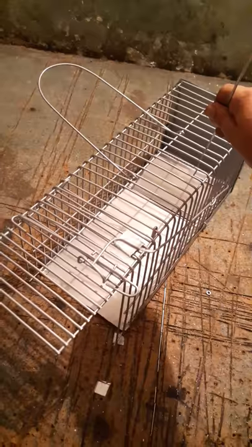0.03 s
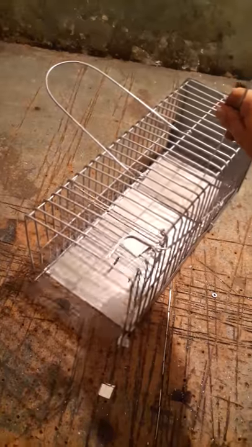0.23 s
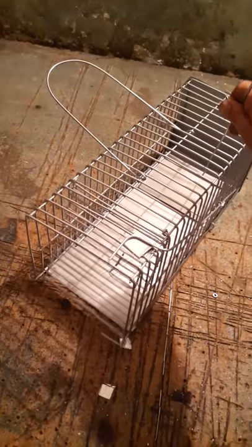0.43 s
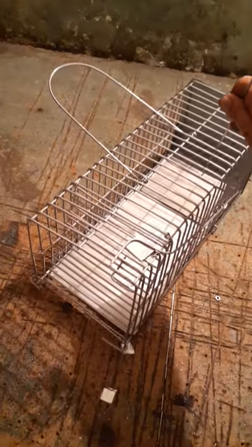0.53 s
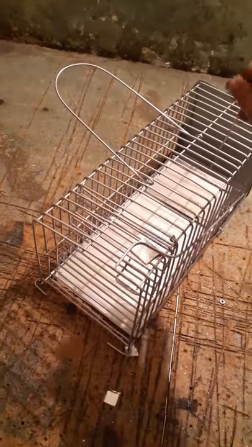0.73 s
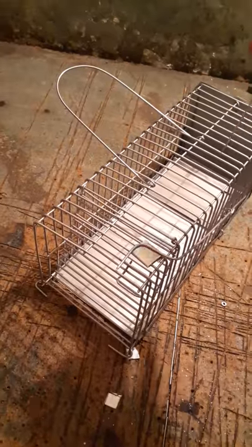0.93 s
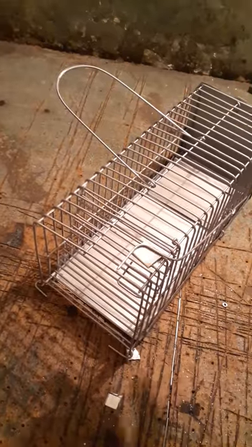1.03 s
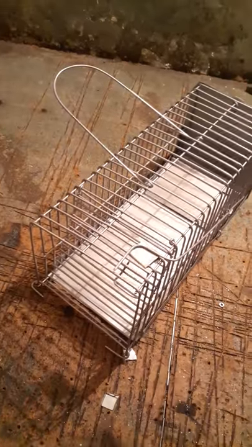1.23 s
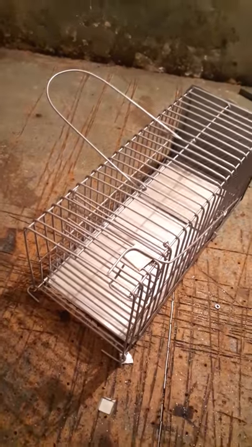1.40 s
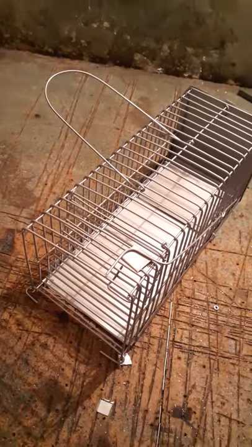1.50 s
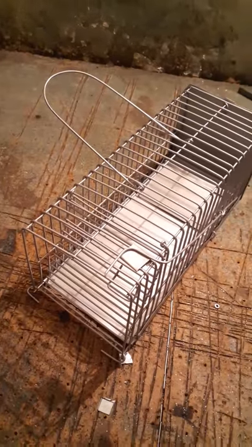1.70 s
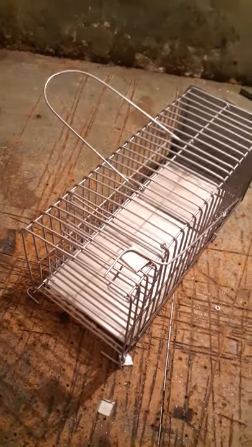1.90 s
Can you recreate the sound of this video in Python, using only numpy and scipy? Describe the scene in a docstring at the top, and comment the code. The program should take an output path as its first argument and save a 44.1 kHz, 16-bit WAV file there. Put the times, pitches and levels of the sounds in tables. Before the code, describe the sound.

Metal cage trap slams shut, its wires ringing and rattling as the lock drops.

```python
"""Cage trap slamming shut

A wire cage trap on concrete between hard walls, close to a stereo pair of microphones. Its sprung door
is tripped, swings down and slams; the locking bail drops with a high ping and rattles home. Every blow
rings the wires and the sheet floor, and the walls draw it out. One last click follows, over quiet air
with a low hum and faint, thin high buzzes."""
import sys
import numpy as np
from scipy import signal
from scipy.fft import rfft, irfft
from scipy.io import wavfile
from scipy.ndimage import uniform_filter1d

SR = 44100
rng = np.random.default_rng(int(sys.argv[2]) if len(sys.argv) > 2 else 0)


def to_wav(s):
    """Save 16-bit WAV."""
    ch = np.atleast_2d(s).T  # columns
    pcm = np.round(np.clip(ch, -1, 1) * 32767)  # PCM
    wavfile.write(sys.argv[1], SR, pcm.astype(np.int16))


N = 85995
T, F = np.arange(N) / SR, np.maximum(np.fft.rfftfreq(N, 1 / SR), 1)

# spectrum of the air in the place (frequency [Hz], relative level [dB])
AIR_SPECTRUM = [(18, -58.5), (30, -42.5), (75, -9.5), (177, -13), (243, -10), (277, -12), (350, -7),
                (420, -11.5), (970, -14.5), (1050, -16.5), (2180, -18), (3590, -35.5), (4910, -32),
                (7260, -37.5), (15500, -45)]
# low background hum (frequency [Hz], level [dB])
HUM_TONES = [(247.6, -69.5), (382, -75)]
# faint thin buzzes (start [s], end [s], frequency [Hz], width [Hz], level [dB])
HIGH_BUZZES = [(0.95, 1.19, 4960, 260, -63.5), (1.115, 1.5, 5000, 300, -67),
               (1.416, 1.689, 4910, 330, -73.5), (0.869, 1.099, 9330, 500, -68.5),
               (0.89, 1.119, 11400, 4320, -73), (1.76, 2.3, 14700, 2000, -79.5)]
# loose parts ringing briefly (time [s], frequency [Hz], width [Hz], level [dB], t60 [s])
LOOSE_PARTS = [(0.622, 1342, 300, -37.5, 0.32), (0.672, 255, 70, -47.5, 0.15),
               (0.870, 2113, 138.6, -54, 0.63), (1.080, 233, 160, -44, .06)]
# the catch settling (time [s], rise [s], relative level at each of BANDS_HZ [dB], decay scale [s])
CATCH_CLICKS = [(0.867, 0.014, -84, -70, -60, -71.5, -79, 1),
                (1.079, .002, -56, -53, -60, -85, -101.5, 0.038),
                (1.127, 0.0015, -64, -57.5, -57.5, -52, -39, 0.42),
                (1.812, .004, -58, -63, -78, -87, -97, 0.095)]
# modes of the door spring (frequency [Hz], level [dB], t60 [s])
SPRING_MODES = [(67.7, -46.5, .9), (294.3, -43, 0.52), (312, -48, .6), (613.4, -48, 0.66), (1070, -48, .7),
                (2110, -48.5, .6)]
# modes of the locking bail besides its main ping (frequency [Hz], level [dB], t60 [s])
BAIL_MODES = [(8768, -24.5, .17), (8715, -34, 0.19), (15430, -35.5, .33), (11830, -36, .38),
              (6400, -37.5, 0.51), (2156, -37.5, .4), (325, -33.5, .25)]
# modes of the frame and sheet floor (frequency [Hz], relative level [dB], t60 [s])
FRAME_MODES = [(70, -4, 0.76), (137.3, -9.5, 0.91), (198.2, -2.5, 0.47), (304, -3, 0.37), (325, -4.5, 0.48),
               (460, -10.5, 0.77), (667, 1, .7), (804, -8.5, .6), (907.7, 1, 0.37), (1075.3, -3, .7),
               (1858, -0.5, .5), (2136, -13, .7), (2902, -11.5, 0.41), (4407, -13.5, .45),
               (4720, -14.5, .42), (6280, -9.5, .6), (6520, -7.5, .55)]
# colour shared by all blows and clicks (frequency [Hz], gain [dB])
CLATTER_SPECTRUM = [(35, -30.5), (52, -23.5), (72, -5.5), (170, -3.5), (310, 1.5), (420, -2.5), (800, 2),
                    (1400, 1), (2100, 5.5), (2900, 1.5), (4200, 3.5), (6200, 5), (7400, 1), (9000, 2),
                    (12000, 2.5), (14300, 1.5), (15600, 0.5)]
# how long the clatter hangs between the walls (frequency [Hz], t60 [s])
CLATTER_DECAY = [(80, 0.29), (300, 0.64), (900, 0.71), (2200, 0.52), (5000, 0.47), (9000, 0.39),
                 (15000, 0.33)]
# blows on the cage (time [s], rise [s], relative level at each of BANDS_HZ [dB], push on the frame [dB])
CAGE_BLOWS = [(0.086, 0.0061, -54, -48, -54.5, -47, -45, -18),
              (0.122, .012, -49.5, -49, -48.5, -64, -81, -23.5),
              (0.156, .008, -43, -35.5, -45.5, -47, -46.5, -18),
              (0.201, 0.0034, -54.5, -34, -42, -39.5, -40, -22.5),
              (0.250, .009, -32, -26, -27, -26, -19, 1.5),
              (0.272, 0.0057, -53.5, -40, -40.5, -28.5, -30.5, -4.5),
              (0.318, .006, -34, -46, -37.5, -29.5, -24.5, -16),
              (0.463, 0.0085, -52, -41, -37, -36.5, -23, -11.5),
              (0.496, .003, -45, -35.5, -35.5, -32.5, -22.5, -13.5),
              (0.548, 0.0085, -60, -45, -54.5, -47.5, -30, -32),
              (0.585, .010, -53, -46, -57.5, -44, -48, -20),
              (0.632, 0.0084, -54, -53, -49.5, -73, -71, -28)]
# bass, low-mid, mid, presence and treble of a blow or click (frequency [Hz])
BANDS_HZ = [150, 650, 1800, 4800, 12000]

MIC_LAG_S, BAIL_LAG_S = .0002, .00036  # cage and bail reach the right microphone this much later
WIRE_DB, CRACK_DB, WASH_DB, FRAME_DB = -4, -8, 1.5, -30.5  # gains of the parts of a blow
CHATTER_S = .012  # time scale of the bounces within a blow


def undb(db):
    """Decibels to gain."""
    return 10 ** (np.asarray(db) / 20)


def unit(x):
    """Scale to rms 1."""
    return x / np.sqrt(np.mean(x ** 2))


def curve(points, hz):
    """Read (Hz, value) points on a log-frequency axis."""
    p = np.array(points, float)
    return np.interp(np.log(hz), np.log(p[:, 0]), p[:, 1])


def pan(db):
    """Microphone gains with the left louder by db."""
    return undb(np.vstack([db, -db]) / 2)


def fall(t, t60):
    """Exponential decay, 60 dB in t60 seconds."""
    return np.exp(-np.log(1000) * np.maximum(t, 0) / t60)


def attack(start, rise):
    """Linear rise from a given time."""
    return np.clip((T - start) / max(rise, 1e-4), 0, 1)


def diffuse(alike_below_hz=440):
    """Spectrum of noise at the two microphones: alike in the bass, unrelated above."""
    mid, side = np.exp(2j * np.pi * rng.random((2, len(F))))
    likeness = np.sinc(F / (2 * alike_below_hz))
    likeness += (1 - likeness) * np.exp(-(F / alike_below_hz) ** 2)
    side = side * np.sqrt(1 - likeness) * np.array([[1], [-1]])
    return (mid * np.sqrt(1 + likeness) + side) * np.sqrt(N / 2)


def band(hz, width):
    """Noise in one resonance."""
    return unit(irfft(diffuse() / (1 + ((F - hz) / width * 2) ** 2), N))


def mode(start, hz, t60, lag=0):
    """One decaying partial, lag seconds later at the right microphone."""
    t = np.maximum(T - start - np.array([[0], [lag]]), 0)
    return np.sin(2 * np.pi * hz * t) * fall(t, t60)


def colour(levels):
    """Gain per frequency of a blow: its band levels and the clatter's colour on a pink slope."""
    db = curve(list(zip(BANDS_HZ, levels)), F) + curve(CLATTER_SPECTRUM, F)
    return undb(db) * np.sqrt(SR / 2 / np.maximum(F, 100))


def clusters(depth_db=3, width_hz=51):
    """Uneven gain along the spectrum where the cage's resonances bunch together."""
    bins = int(width_hz * N / SR)
    ripple = uniform_filter1d(rng.standard_normal(len(F)), bins)
    ripple = unit(uniform_filter1d(ripple, bins // 2))
    return unit(undb(depth_db * ripple))


def background(lull_s=1.5, lull_db=-58.68, slope_db_per_s=2, fade_s=.085):
    """All around the microphones: air that sinks to a lull, a low hum, buzzes that swell and fade."""
    air = unit(irfft(diffuse() * undb(curve(AIR_SPECTRUM, F)), N))
    out = air * undb(lull_db + slope_db_per_s * abs(T - lull_s))
    out += sum(undb(db) * band(hz, width=8) for hz, db in HUM_TONES)
    for start, end, hz, width, db in HIGH_BUZZES:
        swell = attack(start, fade_s) * (1 - attack(end - fade_s, fade_s))
        out += undb(db) * band(hz, width) * swell
    return out


def wash(start, rise, gain, decay):
    """Countless cage modes and wall reflections, each octave dying at its own rate."""
    noise, out = diffuse() * gain, 0
    octave = np.clip(np.round(np.log2(F / 110)), 0, 7)
    for k in range(8):
        part = octave == k
        out += irfft(noise * part, N) * fall(T - start, curve(decay, F[part].mean()))
    return out * attack(start, rise)


def loose_parts():
    """Loose parts ring faintly after the slam, each half tone and half noise."""
    out = 0
    for start, hz, width, db, t60 in LOOSE_PARTS:
        ting = .66 * mode(start, hz, t60) + .7 * band(hz, width) * fall(T - start, t60)
        out += undb(db) * ting * attack(start, .016 * t60)
    return out


def catch(ring, bunching, ring_db=-1.5):
    """The catch settles in light clicks that stir the wires and come back off the walls."""
    out = 0
    for start, rise, *levels, decay_s in CATCH_CLICKS:
        gain = colour(levels) * bunching
        decay = [(500, 2.14 * decay_s), (5000, 1.06 * decay_s), (14000, .73 * decay_s)]
        out += wash(start, rise, gain, decay)
        struck = np.roll(irfft(ring * gain, N), int(start * SR), axis=1)
        out += undb(ring_db) * struck * attack(start, rise) * fall(T - start, 3 * decay_s)
    return out


def spring(start=.097):
    """Freed by the trigger, the spring twangs while the door swings."""
    twang = sum(undb(db) * mode(start, hz, t60, MIC_LAG_S) for hz, db, t60 in SPRING_MODES)
    return twang * attack(start, rise=.03)


def bail(start=.4592, ping_hz=13362):
    """The stiff locking wire lands left of centre: a high flash and softer tail over weaker modes."""
    flash = undb(-14) * mode(start, ping_hz, t60=.06, lag=BAIL_LAG_S)
    tail = undb(-18.5) * mode(start, ping_hz, t60=.29, lag=BAIL_LAG_S)
    body = sum(undb(db) * mode(start, hz, t60, BAIL_LAG_S) for hz, db, t60 in BAIL_MODES)
    return pan(db=4) * (flash + tail + body)


def wires(count=520, spread_db=1.5, t60_share=.83):
    """Spectrum of the ringing wires, each with its own pitch and its own strength at each microphone."""
    t, out = T[:N // 3], 0
    for draw, strength in zip(rng.random((count, 4)), rng.standard_normal((count, 2))):
        height, sustain, offsets = draw[0], draw[1], draw[2:, None]
        hz = 450 + 15200 * height ** 2
        t60 = t60_share * curve(CLATTER_DECAY, hz) * (.8 + .4 * sustain)
        mic_gains = undb(spread_db * np.tanh(strength))[:, None] * np.sqrt(height)
        out += mic_gains * np.sin(2 * np.pi * (hz * t + offsets)) * fall(t, t60)
    onset_rms = np.sqrt(np.mean(out[:, :SR // 100] ** 2))
    return rfft(out / onset_rms, N)


def chatter(start, rise, count=14):
    """Wire bouncing on wire: a fading cluster of sharp contacts with unit energy."""
    position, scatter = rng.random((2, count))
    delay = position * (rise - CHATTER_S * np.log(scatter))
    force = rng.standard_normal(count) * np.exp(-delay / (2 * CHATTER_S))
    out = np.zeros(N)
    np.add.at(out, np.clip(((start + delay) * SR).astype(int), 0, N - 1), force)
    return out / np.sqrt(np.sum(out ** 2))


def sheet_floor(start=.285, gain_db=-23):
    """The sheet floor swings out after the slam and booms in its two lowest modes."""
    boom = sum(undb(db + gain_db) * mode(start, hz, t60) for hz, db, t60 in FRAME_MODES[:2])
    return boom * attack(start, rise=.017)


def frame():
    """Each blow pushes the frame, whose modes build up briefly and ring on."""
    pushes = np.zeros((1, N))
    for start, *_, push_db in CAGE_BLOWS:
        pushes[0, int(start * SR)] += undb(push_db)
    modes = sum(undb(db) * mode(0, hz, t60, MIC_LAG_S) for hz, db, t60 in FRAME_MODES)
    return undb(FRAME_DB) * signal.fftconvolve(pushes, modes * attack(0, rise=.013), axes=1)[:, :N]


def door(ring, bunching):
    """Release, swing, slam and rebounds, heard close: contacts crack, wires ring, the walls answer."""
    mic_delay = np.exp(-2j * np.pi * F * np.array([[0], [MIC_LAG_S]]))
    crack = undb(CRACK_DB) * np.sqrt(CHATTER_S * SR) * mic_delay
    out = 0
    for start, rise, *levels, _ in CAGE_BLOWS:
        gain = colour(levels) * bunching
        contacts = rfft(chatter(start, rise)) * gain * F / np.hypot(F, 900)  # thin below 900 Hz
        out += irfft(contacts * (undb(WIRE_DB) * ring + crack), N)
        out += undb(WASH_DB) * wash(start, rise, gain, CLATTER_DECAY)
    return out


def scene():
    """The trap and the place at the microphones; bass and treble lean a little to the left."""
    ring, bunching = wires(), clusters()
    slam = door(ring, bunching) + frame() + sheet_floor() + spring() + bail()
    mix = slam + loose_parts() + catch(ring, bunching) + background()
    lean_db = curve([(70, 4.5), (300, 0), (700, -.77), (4000, 1.5)], F)
    return irfft(rfft(mix) * pan(lean_db), N)


def record(dry):
    """The recorder turns the bass below 56 Hz down by up to 8 dB and cuts steeply above 15.7 kHz."""
    bass_shelf = np.maximum(1 / np.sqrt(1 + (56 / F) ** 20), .4)
    top_cut = signal.ellip(12, .2, 80, 15700, fs=SR, output="sos")
    return signal.sosfilt(top_cut, irfft(rfft(dry) * bass_shelf, N))


dry = scene()
out = record(dry)
to_wav(out)
```